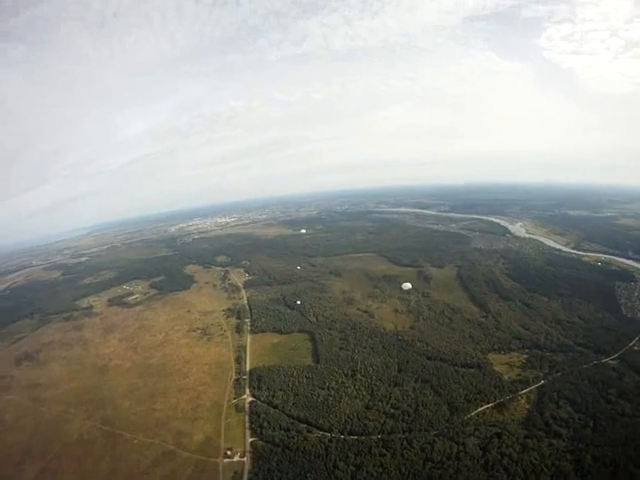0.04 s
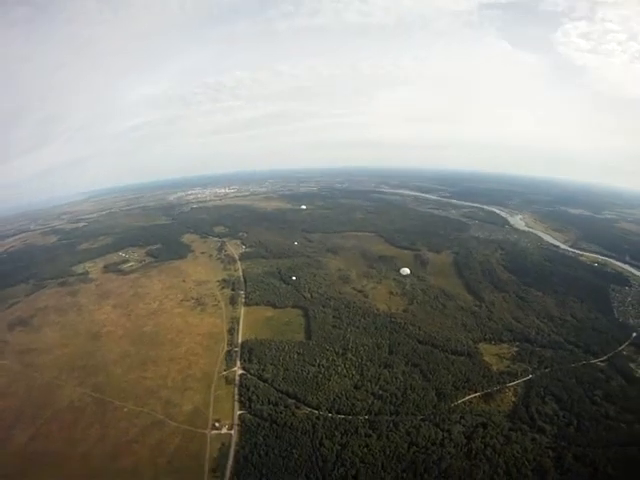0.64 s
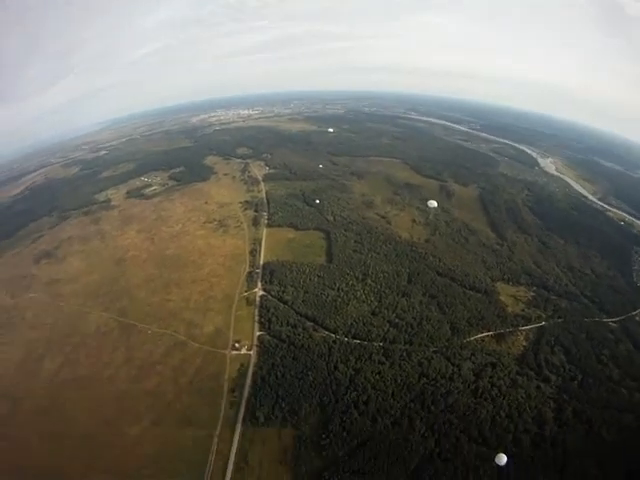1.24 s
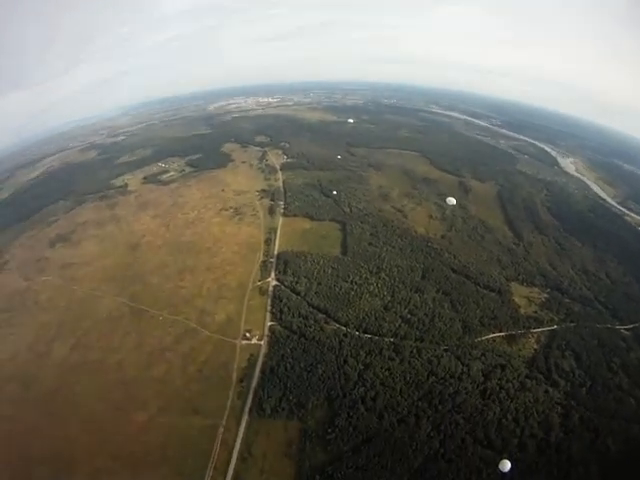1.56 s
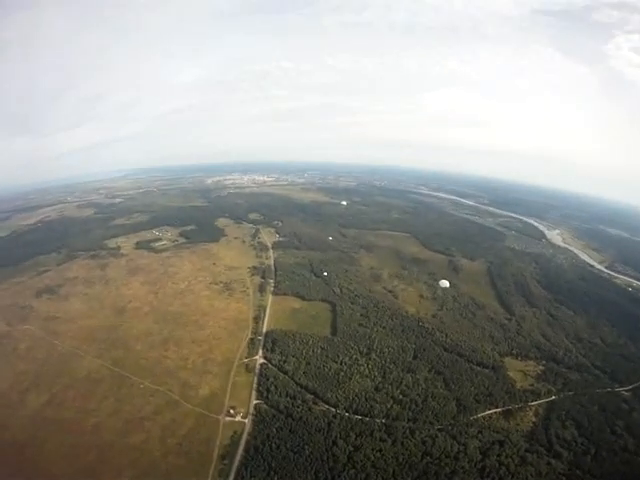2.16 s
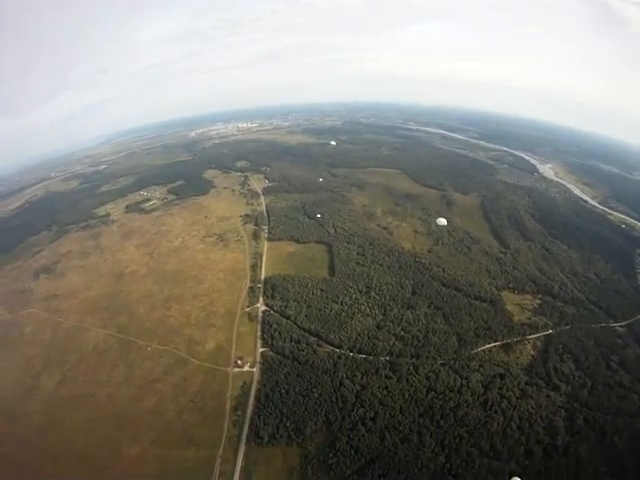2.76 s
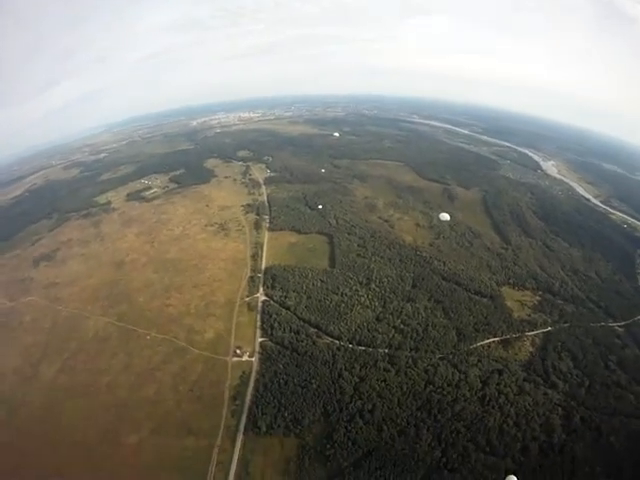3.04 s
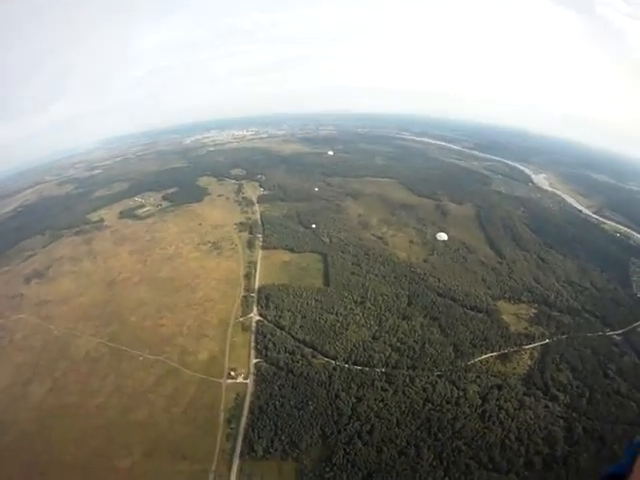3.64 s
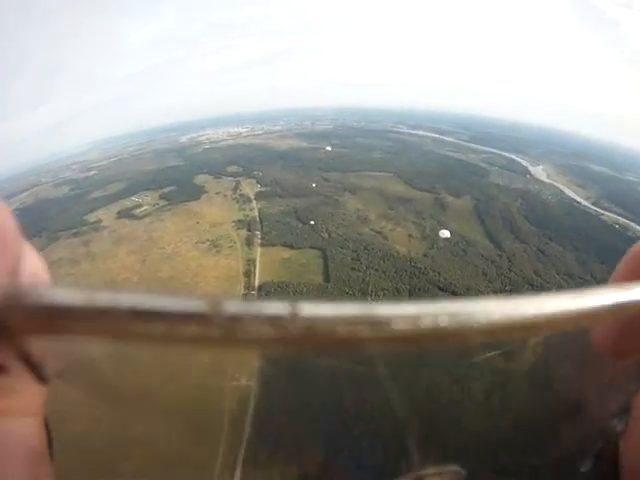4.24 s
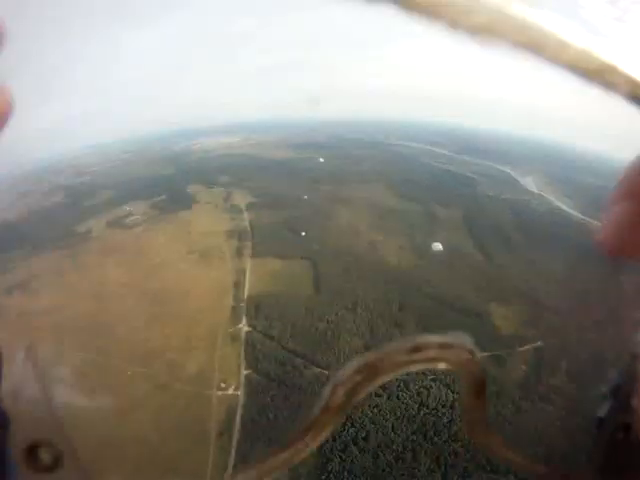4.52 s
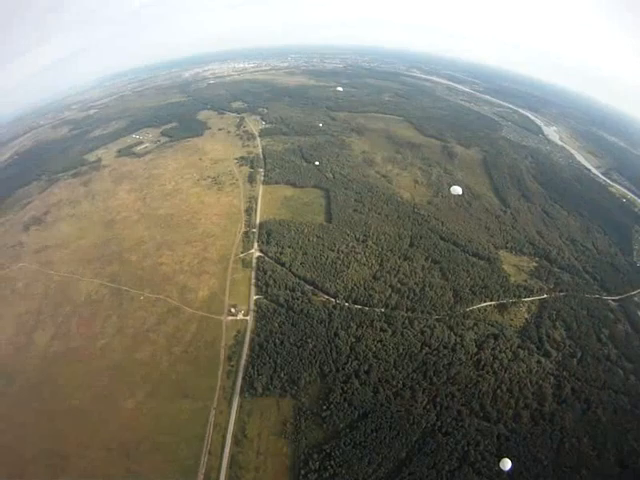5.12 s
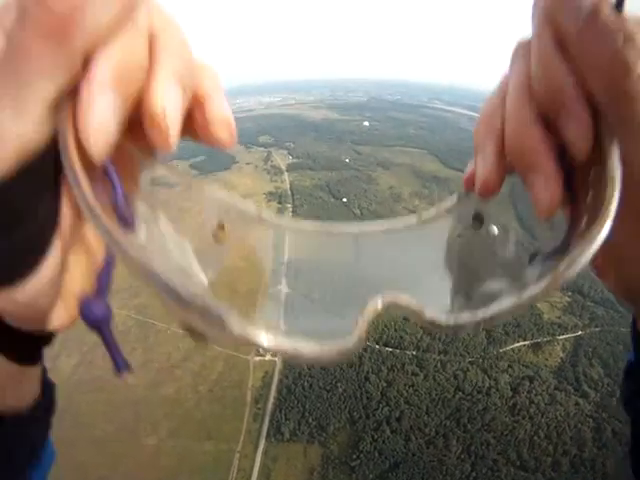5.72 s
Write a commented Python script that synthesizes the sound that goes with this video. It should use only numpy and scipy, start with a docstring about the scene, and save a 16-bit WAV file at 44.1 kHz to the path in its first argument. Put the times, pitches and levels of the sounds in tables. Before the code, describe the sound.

High in the open air under a parachute, wind buffets a helmet microphone with a deep, uneven rumble, rasping in the sharper gusts. Beneath it fabric rustles and flaps softly, harness fittings tick, and a faint airy whistle shows in the lulls. The wind eases, builds again through the second half, then drops. Near the end plastic goggles give one sharp clack right by the microphone. Everything is close and dry.

```python
"""Wind on a helmet camera under a parachute.

Open air, no room, everything close to one microphone. Eddies buffet its port and rasp in the sharpest
gusts; air rustles over fabric and whistles faintly across a gap. Folds flap, harness fittings tick, and
plastic goggles knock near the end. The camera samples slowly, so a thin mirror image of the wind
sizzles around 12 kHz."""
import sys
import numpy as np
from scipy import signal
from scipy.fft import rfft, irfft, next_fast_len
from scipy.io import wavfile
from scipy.ndimage import uniform_filter1d

SR = 44100
rng = np.random.default_rng(int(sys.argv[2]) if len(sys.argv) > 2 else 0)


def dump(signal):
    """Clip the signal to [-1, 1] and save it as 16-bit WAV at the path in sys.argv[1]."""
    limited = np.clip(np.atleast_2d(signal).T, -1, 1)
    pcm = np.round(limited * 32767).astype(np.int16)
    wavfile.write(sys.argv[1], SR, pcm)


N = 254898
TIME = np.arange(N) / SR
FFT_SIZE = next_fast_len(N + SR // 4)
FREQS = np.maximum(np.fft.rfftfreq(FFT_SIZE, 1 / SR), 1)

# Strength of the flow at the microphone port. Each row: time in seconds, relative level in dB.
FLOW = [(0.07, -14.5), (0.17, -29), (0.53, -25), (0.65, -36), (1.15, -33.5), (1.33, -27), (1.62, -28.5),
        (1.9, -39.5), (2.62, -42), (2.83, -26), (3.0, -27), (3.45, -30), (3.79, -28), (3.87, -17),
        (4.15, -26.5), (4.58, -25.5), (4.72, -20.5), (4.98, -17.5), (5.12, -36), (5.64, -39.5)]
BRISK_FLOW_DB = -25.5  # reference flow for eddy size and rasp
# Air passing over fabric and harness. Each row: time in seconds, relative level in dB.
FABRIC_AIR = [(0, -42.5), (0.3, -51.0), (0.58, -59.5), (0.7, -49), (1.15, -48), (1.33, -50), (1.43, -61),
              (1.8, -51.5), (2.8, -58), (3.0, -65), (3.77, -59.5), (3.86, -46.0), (4.3, -54.5), (4.97, -47),
              (5.04, -58.5), (5.16, -46.5), (5.35, -51), (5.64, -50)]
# Spectrum of flaps, ticks and goggle cracks. Each row: frequency in Hz, gain in dB.
TICK_COLOUR = [(300, 8.5), (1200, -9.5), (2100, 7.5), (3000, 0.5), (4000, -3), (5500, -10.5)]


def buffet(deep_hz=70, large_hz=185, small_hz=620, shrink_octaves_per_db=0.06):
    """Large eddies press on the port and saturate; a stronger flow breaks into small, bursting ones."""
    # Spectrum of the pressure on the port. Each row: frequency in Hz, gain in dB.
    pressure_colour = [(15, -15), (30, -5), (50, 2.5), (100, 2), (180, -1), (310, -8), (500, -14),
                       (650, -22.5), (850, -37), (1200, -43.5), (2000, -54.5), (3000, -53), (5500, -80)]
    # Deep rumble of the very largest eddies. Each row: time in seconds, relative level in dB.
    rumble = [(0.0, -55), (0.4, -19.5), (0.58, -46), (0.71, -24.5), (1.87, -25.5), (2.27, -35), (2.33, -24),
              (2.41, -31.5), (3.38, -15.5), (4.04, -31), (5.02, -22.5), (5.65, -30.5), (5.78, -42.5)]
    # Big eddies thump the port. Each row: centre in seconds, bass lift in dB.
    thumps = [(.02, 3), (0.271, 5), (.37, 3), (1.31, 6.5), (1.631, 1.5), (2.821, 5), (3.3, 3.5), (3.6, 6),
              (4.5, 4.5)]
    # The flow breaks away from the port for a moment. Each row: centre in seconds, drop in dB.
    slacks = [(1.0, 3.5), (3.21, 2.5), (3.41, 6), (3.78, 4.5), (4.11, 0.5), (4.56, 4)]
    flow_db = curve(FLOW)
    deep_db = curve(rumble) + 3
    # large eddies ride 16 dB above the flow and level off at -12.5 dB
    saturated_db = -20 * np.log10(np.hypot(undb(-flow_db - 16), undb(12.5)))
    large_db = saturated_db + sum(db * swell(s, half_s=0.057) for s, db in thumps)
    small_db = flow_db + 13 + 2 * flicker(55)
    shrink_octaves = shrink_octaves_per_db * (flow_db - BRISK_FLOW_DB)
    eddy_hz = np.minimum(large_hz * 2 ** shrink_octaves, small_hz / 2)
    turbulence = noise(colour(pressure_colour))
    octave = np.clip(np.log2(FREQS / 40), 0, 7)
    pressure = 0
    for k in range(8):
        hz = 40 * 2 ** k
        band = shape(turbulence, np.maximum(1 - abs(octave - k), 0))
        # even out slow drift, so that the flow sets the mean push of each eddy size
        band = band / np.sqrt(uniform_filter1d(unit(band) ** 2, size=SR // 6))
        smallness = np.clip(np.log(hz / eddy_hz) / np.log(small_hz / eddy_hz), 0, 1)
        band_db = large_db + smallness * (small_db - large_db)
        rumble_share = 1 / (1 + (hz / deep_hz) ** 4)
        band_db = band_db + rumble_share * (deep_db - band_db)
        tumble_db = flicker(21)
        pressure = pressure + band * undb(band_db + tumble_db)
    slack_db = sum(db * swell(s, half_s=0.033) for s, db in slacks)
    lurch_db = 0.5 * flicker(22)
    return pressure * undb(lurch_db - slack_db)


def rasp(pressure, gain_db=4.5, growth_db_per_db=0.57):
    """Fast air tearing at the rim of the port spits noise on every pressure peak of the buffet."""
    # Spectrum of the tearing air. Each row: frequency in Hz, gain in dB.
    rasp_colour = [(300, -7), (800, 7.5), (1300, -2), (2000, -6), (3000, -22), (5500, -36)]
    # Jets across the port. Each row: centre in seconds, relative level in dB, half length in seconds.
    jets = [(0.045, -32.5, 0.098), (.25, -44.5, 0.06), (0.404, -43.5, 0.19), (1.564, -51, 0.15),
            (2.883, -43.5, 0.066), (3.074, -44, 0.044), (3.686, -45.5, 0.17), (3.887, -44.5, 0.083),
            (4.933, -33.5, 0.029)]
    steady = undb(-56 + growth_db_per_db * (curve(FLOW) - BRISK_FLOW_DB))
    surges = sum(undb(db) * swell(s, half_s) for s, db, half_s in jets)
    peaks = pressure ** 2 / uniform_filter1d(pressure ** 2, size=SR // 16)
    spits = rng.standard_normal(N) * (0.13 + peaks) ** 0.55
    return unit(shape(spits, colour(rasp_colour))) * np.hypot(steady, surges) * undb(gain_db)


def goggles(crack_db=-3, ring_db=-1):
    """Goggles knock and settle close to the microphone: each contact cracks and rings the plastic."""
    # Contacts. Each row: time in seconds, relative level in dB, the crack's 60 dB decay in seconds.
    knocks = [(5.689, -25, 0.06), (5.6935, -10.5, 0.018), (5.699, -30, 0.16), (5.712, -33.5, .19)]
    # Modes of the frame. Each row: frequency in Hz, relative level in dB, 60 dB decay in seconds.
    modes = [(455, -1.5, 0.029), (1380, -7, 0.0068), (2000, 5, 0.014), (2200, -16.5, 0.081),
             (3120, -21.5, 0.12), (3680, -5.5, 0.017), (5360, -13.5, 0.017)]
    contact = sum(undb(db) * burst(s, 0.00042, t60) for s, db, t60 in knocks)
    crack = noise(colour(TICK_COLOUR)) * contact
    frame = sum(undb(db) * np.sin(2 * np.pi * hz * TIME) * burst(0, 1, t60) for hz, db, t60 in modes)
    ring = sum(undb(db) * np.interp(TIME - s, TIME, frame) for s, db, _ in knocks)
    return undb(crack_db) * crack + undb(ring_db) * ring


def rustle(gain_db=2, grain_db=3, flutter_hz=72.7, works_free_s=5.3):
    """Fabric hisses with tiny crinkles, pulsed by a loose edge that beats harder once it works free."""
    # Spectrum of the crinkling fabric. Each row: frequency in Hz, gain in dB.
    rustle_colour = [(300, -20), (900, -9), (1600, -3.5), (2050, 0), (2400, 0), (2950, 2), (3400, -10),
                     (3780, -5), (4100, -14.5), (4500, -9.5), (5400, -18)]
    beat_hz = flutter_hz * (1 + 0.058 * flicker(20))
    beat = np.sin(2 * np.pi * np.cumsum(beat_hz) / SR)
    depth_db = np.where(TIME < works_free_s, 1, 3)
    crinkles = rng.standard_normal(N) * undb(grain_db * flicker(750) + depth_db * beat)
    return unit(shape(crinkles, colour(rustle_colour))) * undb(curve(FABRIC_AIR) + gain_db)


def flaps_and_ticks(gain_db=-4, tick_rise_s=0.0012, tick_t60_s=0.031, strays_per_s=26):
    """Folds flap and fittings tick near the microphone: short, dry bursts of noise."""
    # Folds of fabric flapping. Each row: time in seconds, relative peak in dB.
    folds = [(.154, -31.5), (1.098, -29.5), (1.211, -36.5), (1.592, -38.5), (1.898, -40), (4.845, -32),
             (4.930, -30)]
    # Harness fittings ticking. Each row: time in seconds, relative peak in dB.
    fittings = [(0.265, -30.5), (0.736, -33), (2.475, -35.5), (2.72, -40), (3.263, -36.5), (3.340, -37.5),
                (3.546, -38), (3.977, -31.5), (4.053, -45), (4.732, -35.5), (5.442, -30.5), (5.653, -24.5)]
    flaps = sum(undb(db) * burst(s, rise_s=0.0064, t60_s=0.13) for s, db in folds)
    ticks = sum(undb(db) * burst(s, tick_rise_s, tick_t60_s) for s, db in fittings)
    # fainter ticks come by chance, their levels scattered around that of the rustle
    hits = rng.random(N) < strays_per_s / SR
    hit_db = curve(FABRIC_AIR) + 2 - 6 * rng.standard_normal(N)
    strays = signal.fftconvolve(hits * undb(hit_db), burst(0, tick_rise_s, tick_t60_s))[:N]
    return (flaps + ticks + strays) * noise(colour(TICK_COLOUR)) * undb(gain_db)


def whistle(pitch_hz=1261, width_hz=190, gain_db=-3.5, choke_db=-30.5, choke_range_db=2):
    """The air that stirs the fabric grazes a gap: a soft, noisy note of steady pitch, choked by gusts."""
    # The stream meets the gap squarely and the note swells. Each row: centre in seconds, lift in dB.
    swells = [(.93, 2), (1.85, 5), (5.19, 7)]
    calm = 1 / (1 + np.exp((curve(FLOW) - choke_db) / choke_range_db))
    lift_db = sum(db * swell(s, half_s=0.23) for s, db in swells)
    note = noise(1 / (1 + (2 * (FREQS - pitch_hz) / width_hz) ** 2))
    return note * calm * undb(curve(FABRIC_AIR) + gain_db + lift_db)


def undb(db):
    """Decibels to gain."""
    return 10 ** (np.asarray(db) / 20)


def unit(x):
    """Scale to an rms of one."""
    return x / np.sqrt(np.mean(x ** 2))


def curve(points):
    """A control over time from (seconds, value) points."""
    return np.interp(TIME, *np.transpose(points))


def colour(points):
    """Gain at every frequency from (Hz, dB) points."""
    hz, db = np.transpose(points)
    return undb(np.interp(np.log(FREQS), np.log(hz), db))


def shape(x, gain):
    """Filter by a gain per frequency."""
    return irfft(rfft(x, FFT_SIZE) * gain, FFT_SIZE)[:N]


def noise(gain):
    """Unit noise with a given spectrum."""
    return unit(shape(rng.standard_normal(N), gain))


def flicker(rate_hz):
    """Random wander of unit spread, up to about the given rate."""
    return noise(1 / (1 + (FREQS / rate_hz) ** 4) * FREQS / (FREQS + 4))


def burst(peak_s, rise_s, t60_s):
    """Envelope that grows exponentially to one, then falls 60 dB in t60_s."""
    age = TIME - peak_s
    exponent = np.where(age < 0, age / rise_s, -np.log(1000) * age / t60_s)
    return np.exp(np.maximum(exponent, -50))


def swell(centre_s, half_s):
    """Smooth rise and fall: one at the centre, a quarter at half_s to either side."""
    return 1 / (1 + ((TIME - centre_s) / half_s) ** 2) ** 2


def scene():
    """Everything reaches one helmet microphone in open air."""
    pressure = buffet()
    return (pressure + rasp(pressure) + rustle() + whistle() + flaps_and_ticks() + goggles())[None]


def record(dry, sampling_hz=12000, input_top_hz=5650, top_hz=15350, upper_side_db=-3):
    """The camera rounds peaks, cuts treble and mirrors the sound either side of its sampling rate."""
    # Strength of the mirror image. Each row: distance from the sampling rate in Hz, gain in dB.
    mirror = [(30, -63), (100, -40.5), (400, -28.5), (1000, -20.5), (2000, -13), (3000, -9.5), (5000, -2.5)]
    fade = np.clip(np.minimum(TIME, TIME[-1] - TIME) / 0.003, 0, 1)
    rounded = np.tanh(dry[0] * fade)
    sound = shape(rounded, 1 / np.sqrt(1 + (FREQS / input_top_hz) ** 70))
    image = 2 * shape(sound, 1j * colour(mirror)) * np.sin(2 * np.pi * sampling_hz * TIME)
    upper_ramp = np.clip((FREQS - sampling_hz) / (top_hz - sampling_hz), 0, 1)
    image = shape(image, undb(upper_side_db * upper_ramp))
    lowpass = signal.ellip(10, 0.2, 80, top_hz, fs=SR, output="sos")
    return signal.sosfilt(lowpass, sound + image)[None]


dry = scene()
out = record(dry)
dump(out)
```